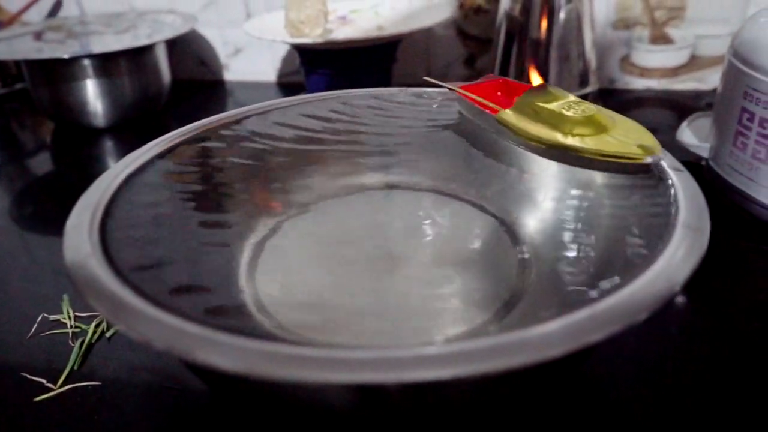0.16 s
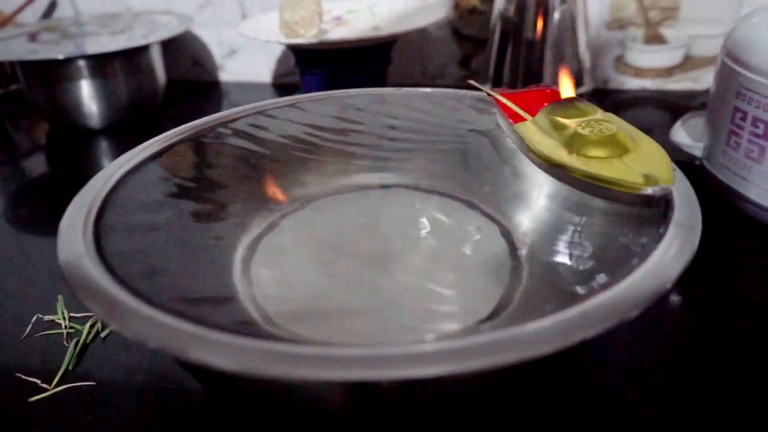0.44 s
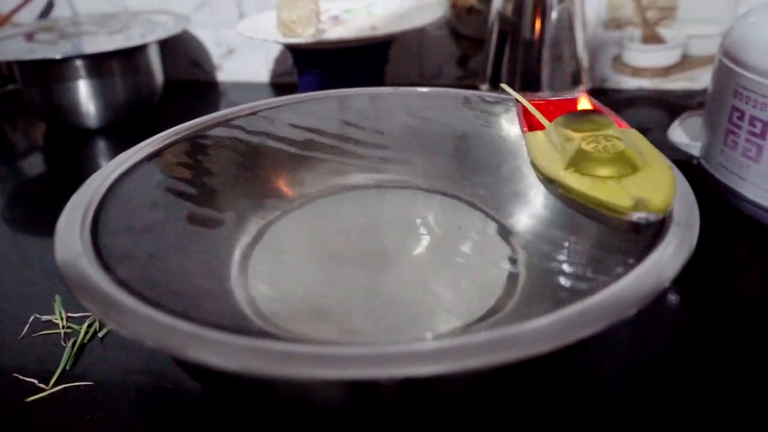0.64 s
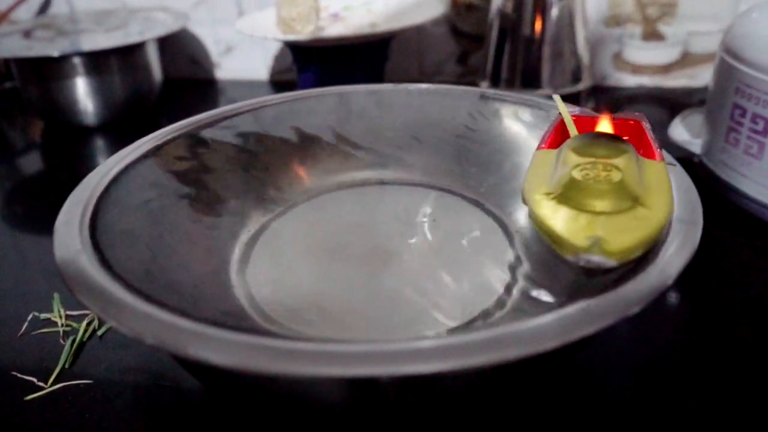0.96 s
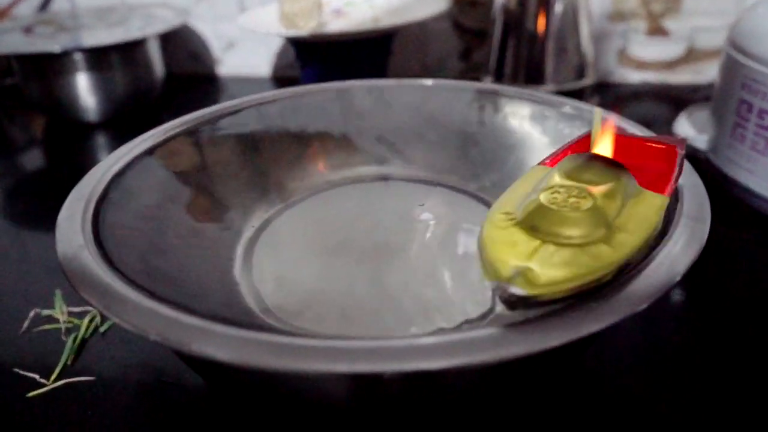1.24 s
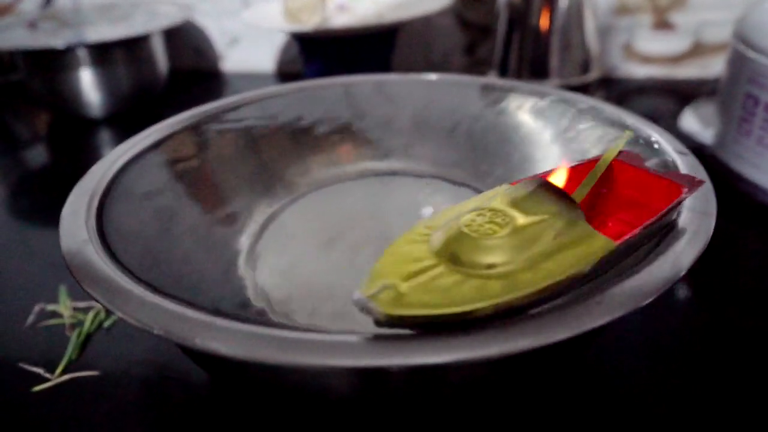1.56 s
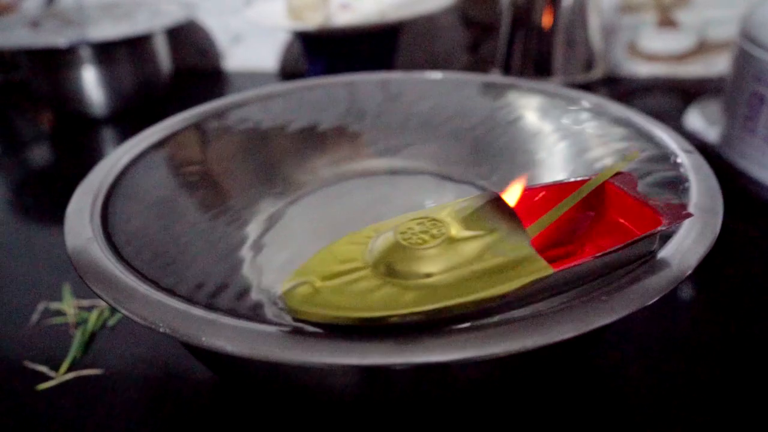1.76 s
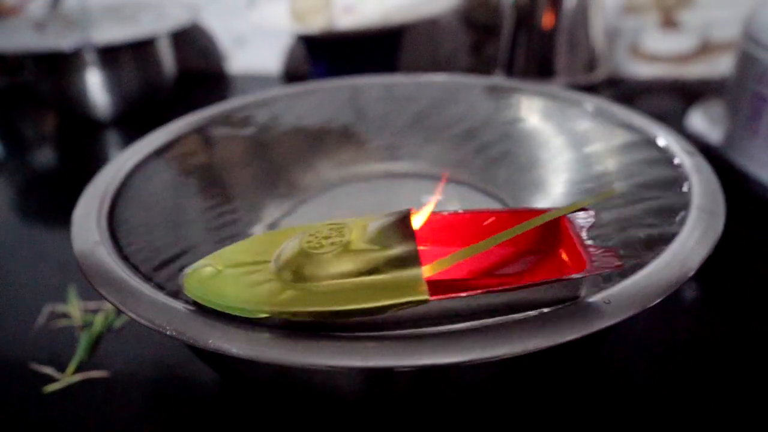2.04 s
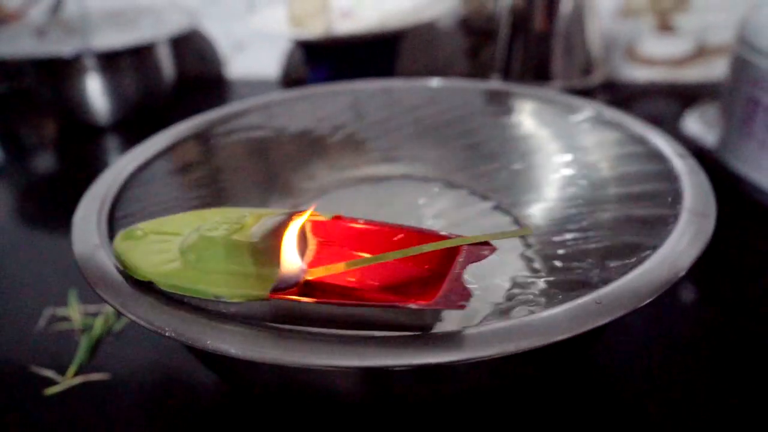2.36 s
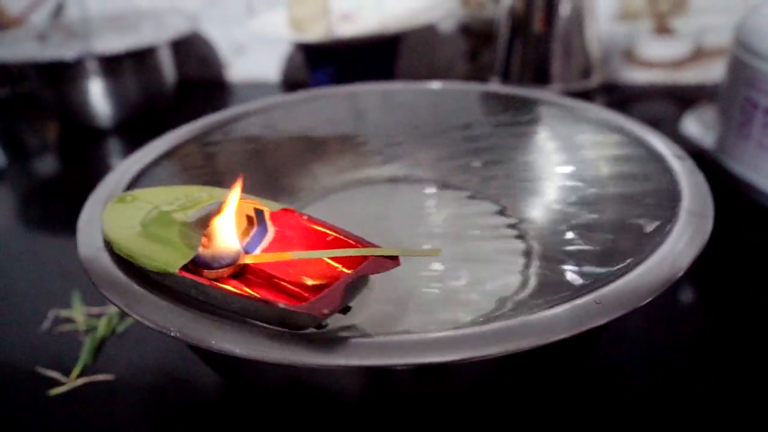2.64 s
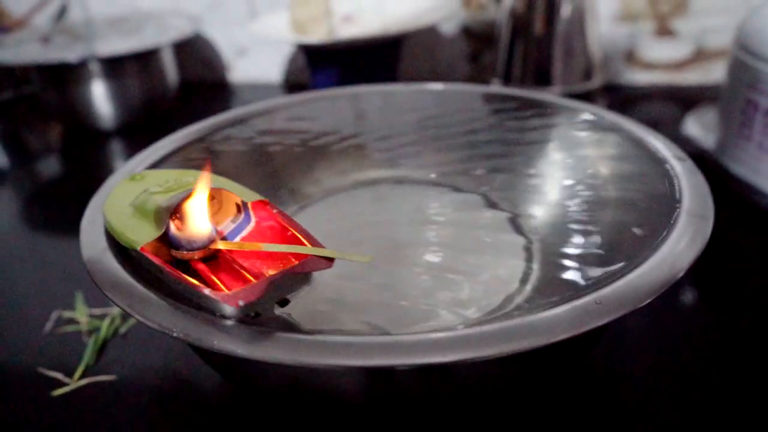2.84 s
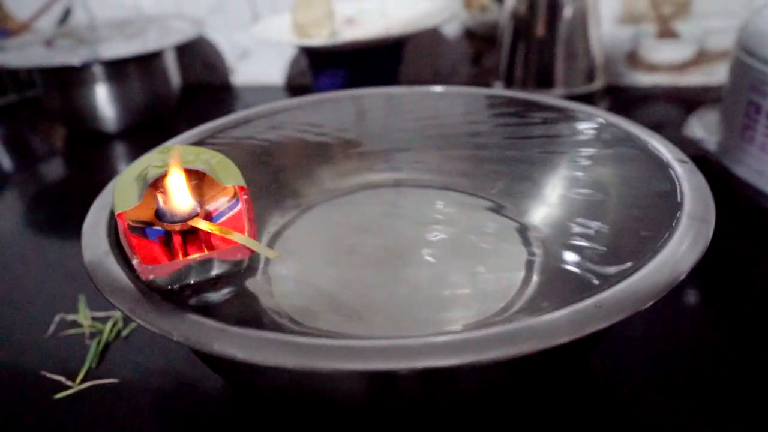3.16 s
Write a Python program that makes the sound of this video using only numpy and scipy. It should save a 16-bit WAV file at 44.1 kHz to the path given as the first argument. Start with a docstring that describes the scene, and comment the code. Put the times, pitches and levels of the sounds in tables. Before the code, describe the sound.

A toy steam boat putters from the start, alternating hollow pops and bright tinny ticks about sixteen times a second, echoed by a steel bowl and small room. At 0.35 seconds it stalls for a beat, then water spits, sizzles and gurgles until 0.8. From 1.5 seconds the putting drifts from the right to left of centre. Near 3 seconds it falters again and resumes, over faint hiss.

```python
"""A flame-heated toy steam boat putters round a steel bowl of water in a small room.
From the start, about 16 times a second, the boiler's tin diaphragm pops out with a hollow note and
snaps back with a bright tick; bowl and room echo each click. At 0.35 s it stalls for a beat, then water
spits, sizzles and gurgles until 0.8 s. From 1.5 s the boat drifts from the right to left of centre.
Near 3 s it stalls once more and picks up again."""
import sys
import numpy as np
from scipy import signal
from scipy.fft import rfft, irfft, next_fast_len
from scipy.io import wavfile
from scipy.ndimage import uniform_filter1d, minimum_filter1d

SR = 44100
rng = np.random.default_rng(int(sys.argv[2]) if len(sys.argv) > 2 else 0)


def store_pcm(level_fs):
    """Save levels as 16-bit WAV."""
    pcm = np.round(np.clip(level_fs, -1, 1) * 32767).astype(np.int16)
    wavfile.write(sys.argv[1], SR, np.atleast_2d(pcm).T)


N = 145089
CLICK = 2048  # samples per click


def amp(db):
    """Decibels to gain."""
    return 10 ** (np.asarray(db) / 20)


def unit(x):
    """Scale to rms 1."""
    return x / np.sqrt(np.mean(np.abs(x) ** 2) + 1e-20)


def along(points, hz):
    """Read a curve on a log frequency axis."""
    f, v = np.transpose(points)
    return np.interp(np.log(hz + 1), np.log(f + 1), v)


def at_time(points, s):
    """Read an automation curve at time s."""
    return np.interp(s, *np.transpose(points))


def sides(db):
    """Pan gains for a left-minus-right level difference."""
    g = amp(np.array([[db], [-db]]) / 2)
    return g / np.sqrt(np.mean(g ** 2))


def delay(hz, s):
    """Frequency response of a delay of s seconds."""
    return np.exp(-2j * np.pi * hz * s)


def filtered(x, response):
    """EQ x with a function of frequency."""
    n = x.shape[-1]
    m = next_fast_len(n + 8192)
    return irfft(rfft(x, m) * response(np.fft.rfftfreq(m, 1 / SR)), m)[..., :n]


def causal(gain):
    """Minimum-phase spectrum of this shape, rms 1: it rings only after the hit."""
    cepstrum = irfft(np.log(np.maximum(gain, 1e-6)))
    cepstrum[1:CLICK // 2] *= 2
    cepstrum[CLICK // 2 + 1:] = 0
    return unit(np.abs(gain)) * np.exp(1j * rfft(cepstrum).imag)


def add(out, s, x):
    """Mix x in at time s."""
    i = int(round(s * SR))
    x = x[:, max(-i, 0):max(N - i, 0)]
    out[:, max(i, 0):max(i, 0) + x.shape[1]] += x


def diffuse(pair, colour):
    """Two unrelated noises become a coloured stereo field, narrow in the bass and wide on top."""
    likeness = [(300, 0.97), (800, .6), (1600, .55), (3000, .25), (8000, 0.069)]  # the room's stereo image: f/Hz, left-right correlation

    def mid_side_eq(hz):
        width = np.arccos(np.clip(along(likeness, hz), -1, 1)) / 2
        return amp(along(colour, hz)) * [np.cos(width), np.sin(width)]

    mid, side = filtered(pair, mid_side_eq)
    return np.array([mid + side, mid - side])


def room_tone():
    """The room's steady hiss over a faint, uneven rumble."""
    hiss_eq = [(25, -45), (150, -30), (300, -16), (800, -11.5), (1700, 3), (3000, 2.5), (8000, 2),
               (15000, -18)]  # hiss colour: f/Hz, level/dB
    rumble_eq = [(25, 0), (140, -2), (1000, -60)]  # rumble colour: f/Hz, level/dB
    drift = uniform_filter1d(rng.standard_normal(N), size=1500, mode='wrap')
    swing_db = 4 * unit(uniform_filter1d(drift, size=1500, mode='wrap'))
    noise = rng.standard_normal((2, N)) + rng.standard_normal(N)
    rumble = filtered(noise, lambda hz: amp(along(rumble_eq, hz))) * amp(swing_db)
    hiss = diffuse(rng.standard_normal((2, N)), hiss_eq)
    return amp(-42) * unit(hiss) + amp(-85) * unit(rumble)


def opening_tail(t60_s=.6):
    """The echo of earlier puttering dies away."""
    tail_eq = [(200, -48), (1200, -2), (1700, 0), (3000, -14), (15000, -23)]  # echo colour: f/Hz, level/dB
    wash = unit(diffuse(rng.standard_normal((2, N)), tail_eq))
    return wash * amp(-26 - 60 * np.arange(N) / SR / t60_s)


def bowl_hum(mode_hz=830, width_hz=16, fade_db_per_s=8):
    """The bowl's low mode rings faintly and fades as the boat moves on."""
    ring = filtered(rng.standard_normal(N), lambda hz: 1 / (1 + 1j * (hz - mode_hz) / width_hz) ** 2)
    return unit(ring) * amp(-47 - fade_db_per_s * np.arange(N) / SR)


def gurgle(count=16, span_s=(.38, .72), centre_hz=930, spread=.22, t60_s=.14):
    """Steam bubbles ring in the water during the sizzle."""
    out, t = np.zeros((2, N)), np.arange(2 * CLICK) / SR
    onsets = rng.uniform(*span_s, count)
    pitches = centre_hz * np.exp(spread * rng.standard_normal(count))
    envelope = (1 - np.exp(-t / .003)) * amp(-35 - 60 * t / t60_s)
    for s, hz in zip(onsets, pitches):
        add(out, s, (np.sin(2 * np.pi * hz * t) * envelope)[None])
    return out


def sizzle(grain=.8, spit_s=.4605, spit_t60_s=.05, low_cut_hz=4000):
    """Water hits the hot tin with a bright spit and sizzles for a moment."""
    swell = [(.41, -44), (.462, -26), (.52, -26), (.6, -30), (.7, -37), (.8, -54)]  # sizzle envelope: t/s, level/dB
    fizz_eq = [(60, -56), (200, -31), (450, -13), (950, 1), (2800, -1), (9500, 1.5), (12000, -7),
               (16000, -23)]  # sizzle colour: f/Hz, level/dB
    t = np.arange(N) / SR
    level_db = np.interp(t, *np.transpose(swell), left=-120, right=-120)
    grains = rng.standard_normal((2, N)) * np.exp(grain * rng.standard_normal(N))
    fizz = unit(diffuse(grains, fizz_eq))
    burst = fizz * amp(-20 - 60 * np.abs(t - spit_s) / spit_t60_s) * (t > spit_s)
    spit = filtered(burst, lambda hz: hz ** 2 / (hz ** 2 + low_cut_hz ** 2))
    return (fizz * amp(level_db) + spit) * sides(db=-3)


def room_reverb(x, onset_s=.007, hop=8192):
    """A stereo tail whose treble dies first; its pattern changes every hop samples as the boat moves."""
    decay = [(1700, .46), (6000, .38), (15000, .3)]  # reverb time: f/Hz, t60/s
    reverb_eq = [(200, -3.5), (900, 0), (1700, -4), (3000, -.5), (6000, -4), (10000, -2), (15000, -4.5)]  # reverb colour: f/Hz, level/dB
    out = np.zeros((2, N))
    x = np.pad(x, ((0, 0), (hop, 2 * hop)))
    window = signal.windows.cosine(2 * hop)
    hz, t, noise = signal.stft(rng.standard_normal((N // hop + 2, 2, SR // 3)), SR, nperseg=256)
    fade = amp(-60 * t / along(decay, hz)[:, None]) * (1 - np.exp(-t / onset_s))
    tails = signal.istft(noise * fade, SR, nperseg=256)[1]
    for k, tail in enumerate(tails):
        part = x[:, k * hop:][:, :2 * hop] * window
        wet = signal.fftconvolve(part, tail / np.linalg.norm(tail[0]), axes=1)
        add(out, (k - 1) * hop / SR, wet)
    return diffuse(out, reverb_eq)


def bowl_echoes(hz, scatter_s=.00014, ear_scatter_s=.00007):
    """The direct sound plus short echoes off the steel wall, shifting as the boat moves."""
    echoes = [(.0037, .33), (.0047, .15), (.0064, .11), (.0106, .17)]  # wall reflections: delay/s, gain
    response = 1
    for s, gain in echoes:
        arrival_s = s + scatter_s * rng.normal() + ear_scatter_s * rng.standard_normal((2, 1))
        response = response + gain * delay(hz, arrival_s)
    return response


def rattle(hz, length_s=.0065, fade_db=4, grain=.45):
    """The tin crinkles for a few milliseconds as it flips."""
    crinkle_eq = [(80, -66), (300, -42), (900, -17), (2400, -5), (3200, -9), (4800, -10.5), (7200, -10),
                  (10300, -8), (12300, -13.5), (15300, -12)]  # broadband colour of the tin: f/Hz, level/dB
    progress = np.arange(CLICK) / SR / length_s
    grains = rng.standard_normal(CLICK) * np.exp(grain * rng.standard_normal(CLICK))
    envelope = amp(-fade_db * progress) / (1 + progress ** 8)
    return unit(causal(amp(along(crinkle_eq, hz))) * rfft(grains * envelope))


def tin_ring(hz, s, scatter_db=3.5, detune=.016, low_cut_hz=1500):
    """The tin's short, bright modes, struck at time s."""
    modes = [(4000, -3.5, .011), (5400, -3.5, .009), (5805, 0, .013), (6650, -15, .025), (8220, -12, .02),
             (8660, -10, .02), (10300, -16, .012)]  # tin modes: f/Hz, level/dB, t60/s
    bend = [(0, .975), (.6, .975), (.75, 1.005), (1.72, .995), (1.9, .89), (1.96, 1)]  # pitch sags and recovers with boiler pressure: t/s, ratio
    low_lift = [(2.6, -1.5), (3.1, 3)]  # the lowest mode carries best from the stern: t/s, level/dB
    t = np.arange(CLICK) / SR
    ring = np.zeros(CLICK)
    for k, (mode_hz, db, t60) in enumerate(modes):
        level_db = db + at_time(low_lift, s) * (k == 0) + scatter_db * rng.normal()
        pitch_hz = mode_hz * at_time(bend, s) * (1 + detune * rng.normal())
        phase = 2 * np.pi * pitch_hz * t + rng.uniform(0, 2 * np.pi)
        ring += amp(level_db - 60 * t / t60) * np.sin(phase)
    attack = 1 - np.exp(-t / .0007)
    low_cut = (1j * hz / (1j * hz + low_cut_hz)) ** 2
    return unit(rfft(ring * attack) * low_cut)


def hollow_note(hz, s, lead_s, flex_db, ring_db, pitch=1, half_width_hz=85, scatter_db=4.5):
    """The diaphragm gives a little, then flips and its main mode rings on, differently each time."""
    body_eq = [(100, -63), (250, -49), (500, -35.5), (740, -22.5), (900, -22.5), (1100, -12.5),
               (1300, -8.5), (1500, -2), (1710, 0), (1950, -.5), (2200, -8), (2500, -11), (3000, -20),
               (5000, -36), (15000, -52)]  # the diaphragm's hollow body: f/Hz, level/dB
    tuning = [(.1, 1800), (.42, 1660), (.95, 1610), (1.25, 1760), (2.1, 1660), (3.2, 1730)]  # its main mode drifts with the heat: t/s, f/Hz
    shifted_hz = hz * np.exp(.03 * rng.normal())
    body = amp(along(body_eq, shifted_hz / pitch))
    detune = (shifted_hz - at_time(tuning, s)) / half_width_hz
    mode = amp(ring_db + scatter_db * rng.normal()) / (1 + 1j * detune)
    flex = causal(body * np.abs(mode)) * delay(hz, -lead_s + .001 * rng.normal())
    return causal(body * np.abs(1 + mode)) + amp(flex_db) * flex


def pops(hz):
    """The diaphragm pops out, mostly hollow note: a (time, spectrum) pair for each pop."""
    hits = [(0.042, -12), (0.1011, -13.5), (0.1637, -14), (0.2278, -13.5), (0.2932, -13.5), (0.409, -13),
            (0.4684, -15), (0.5297, -12), (0.5878, -11.5), (0.6451, -13), (0.704, -12), (0.7666, -13.5),
            (0.8291, -13), (0.8898, -13), (0.9526, -14.5), (1.015, -14.5), (1.077, -14), (1.1387, -14),
            (1.1989, -13), (1.2601, -14.5), (1.3241, -13.5), (1.3844, -13.5), (1.4439, -14),
            (1.5061, -13.5), (1.566, -14), (1.6263, -12.5), (1.6881, -12), (1.7478, -14), (1.8105, -13),
            (1.8706, -13), (1.9301, -11), (1.9921, -13), (2.0522, -12), (2.1154, -12.5), (2.1769, -12),
            (2.2381, -12), (2.299, -11.5), (2.3607, -12), (2.422, -12), (2.4858, -13), (2.5502, -12.5),
            (2.611, -11.5), (2.6745, -12.5), (2.7351, -12.5), (2.8011, -12), (2.8673, -11.5), (2.9349, -11),
            (3.0496, -13), (3.1122, -13.0), (3.1749, -13.7), (3.2366, -14.5)]  # outward flips: t/s, relative level/dB
    trembles = [(.3464, -22), (.378, -27), (2.9866, -22), (3.0195, -24), (3.043, -20)]  # it only trembles in the stalls: t/s, relative level/dB
    rattle_lift = [(1.6, 10), (2.5, 5.5)]  # less rattle as the boat comes round: t/s, level/dB
    for s, db in [*hits, *trembles]:
        hollow = amp(21.7) * hollow_note(hz, s, lead_s=.0055, flex_db=-13, ring_db=.5)
        bright = amp(at_time(rattle_lift, s)) * rattle(hz) + amp(-1) * tin_ring(hz, s)
        yield s, amp(db) * (hollow + bright)


def snaps(hz):
    """The diaphragm snaps back with a bright, tinny tick: a (time, spectrum) pair for each snap."""
    hits = [(0.0137, -21, -18.5), (0.0736, -19, -23), (0.1331, -19.5, -22), (0.1955, -21, -20.5),
            (0.259, -19.5, -18.5), (0.3217, -18.5, -17.5), (0.4381, -19.5, -23), (0.5023, -22, -22.5),
            (0.562, -19.5, -23), (0.6189, -20.5, -20.5), (0.6765, -18, -24), (0.7374, -18.5, -21.5),
            (0.7993, -18, -21), (0.8606, -18.5, -17.5), (0.9228, -17.5, -21), (0.985, -17.5, -22),
            (1.0467, -19.5, -21), (1.1095, -16.5, -27), (1.1716, -17.5, -26), (1.232, -18.5, -18.5),
            (1.2947, -18, -23), (1.3553, -17.5, -33), (1.4173, -20, -23), (1.476, -21, -19.5),
            (1.5372, -17, -26.3), (1.5976, -21, -17), (1.6594, -19.5, -21.7), (1.7209, -20.5, -21),
            (1.781, -20.5, -17.5), (1.8423, -20, -21), (1.9027, -24, -17), (1.9633, -20, -17.5),
            (2.0246, -22, -18), (2.0854, -20, -19), (2.1478, -22.5, -16.5), (2.209, -21.5, -17),
            (2.271, -22.3, -18.8), (2.332, -20, -17.5), (2.3936, -18.5, -18), (2.4548, -17.5, -20),
            (2.5176, -17.9, -18), (2.5808, -21.5, -23), (2.643, -21.5, -14), (2.705, -19.7, -21),
            (2.7684, -19.5, -16.7), (2.832, -18.5, -26), (2.8976, -21.5, -16), (2.9618, -18.5, -21.5),
            (3.0787, -18.5, -11.5), (3.1427, -19.0, -17.7), (3.2062, -19, -14.5), (3.2681, -14, -23)]  # return flips, relative levels: t/s, tick/dB, hollow note/dB
    body_pitch = [(.15, .83), (.8, .95)]  # a snap's body pitch over a pop's: t/s, ratio
    for s, tick_db, note_db in hits:
        hollow = hollow_note(hz, s, lead_s=.002404, flex_db=-8.5, ring_db=4, pitch=at_time(body_pitch, s))
        bright = amp(21.5) * rattle(hz) + amp(22.3) * tin_ring(hz, s)
        yield s, amp(note_db + 21.4) * hollow + amp(tick_db) * bright


def boiler(lag_s_per_db=7e-6):
    """The putter: every flip of the diaphragm, panned with the boat and echoed by bowl and room."""
    path = [(0, -5), (1.5, -6), (2.1, -3), (2.5, 0.5), (3.1, 3)]  # the boat's place: t/s, left minus right/dB
    near, send = np.zeros((2, N)), np.zeros((1, N))
    hz = np.fft.rfftfreq(CLICK, 1 / SR)
    preroll_s = CLICK / SR / 4  # space for the flex ahead of each click
    for s, spectrum in [*pops(hz), *snaps(hz)]:
        click = spectrum * delay(hz, preroll_s)
        pan_db = at_time(path, s)
        lag = delay(hz, lag_s_per_db * pan_db * np.array([[-.5], [.5]]))  # the nearer side leads
        add(near, s - preroll_s, irfft(click * sides(pan_db) * bowl_echoes(hz) * lag))
        add(send, s - preroll_s, irfft(click)[None])
    return near + room_reverb(send)


def scene():
    """Boat, water, bowl and room."""
    return boiler() + opening_tail() + sizzle() + gurgle() + bowl_hum() + room_tone()


def record(dry, top_hz=15850, ceiling=.88):
    """The right microphone is brighter; the very top is cut and a fast limiter holds the peaks."""
    balance = [(300, 0), (4500, -.3), (9000, -3.8)]  # microphone tilt: f/Hz, left minus right/dB
    heard = filtered(dry, lambda hz: amp(along(balance, hz) * np.array([[.5], [-.5]])) * (hz < top_hz))
    needed_gain = ceiling / np.maximum(np.abs(heard).max(axis=0), ceiling)
    held_gain = minimum_filter1d(needed_gain, size=161)
    return heard * uniform_filter1d(uniform_filter1d(held_gain, size=81), size=81)


dry = scene()
out = record(dry)
store_pcm(out)
```